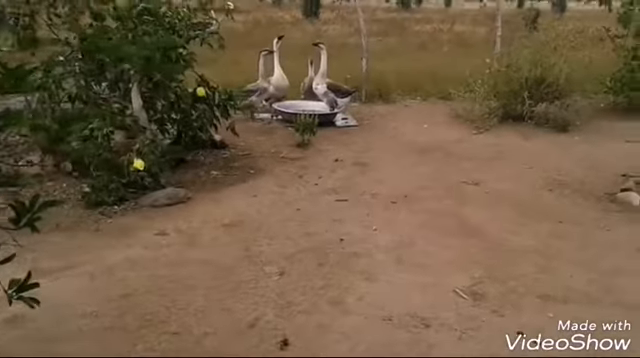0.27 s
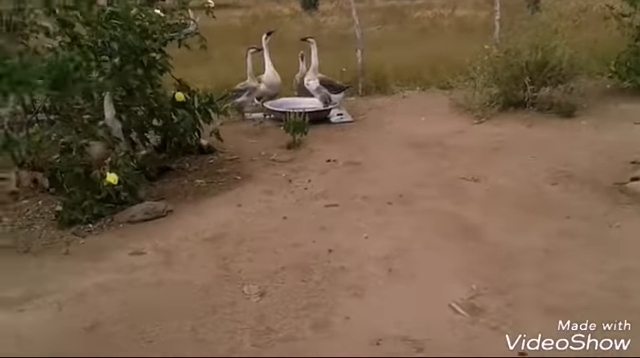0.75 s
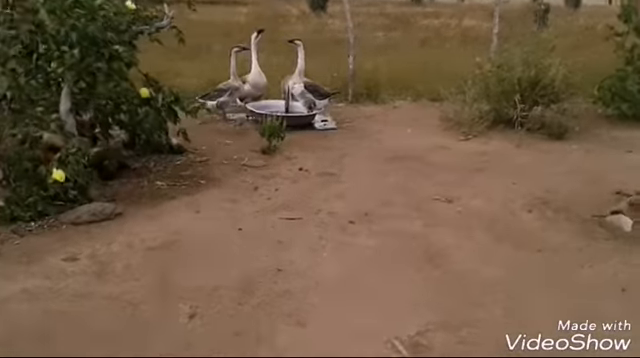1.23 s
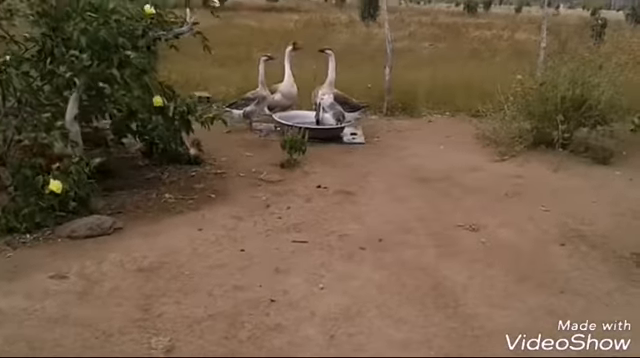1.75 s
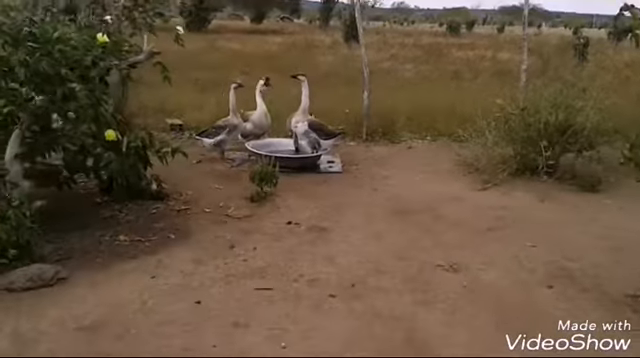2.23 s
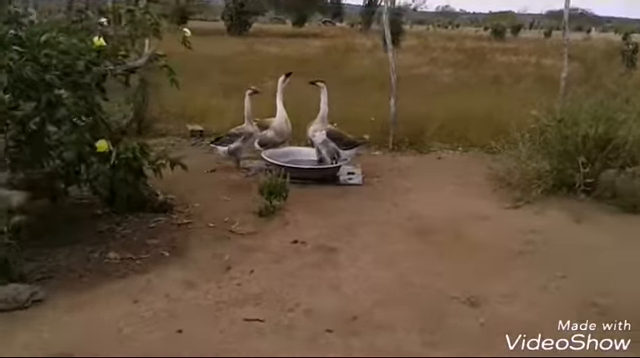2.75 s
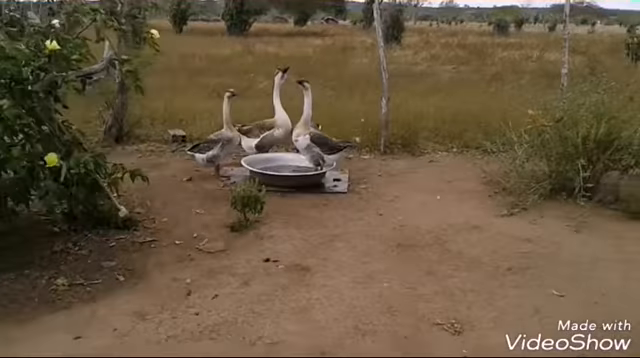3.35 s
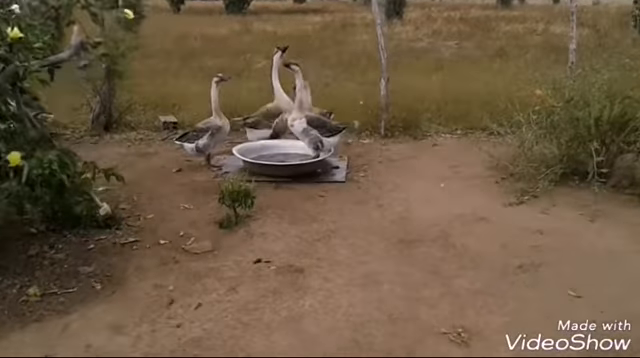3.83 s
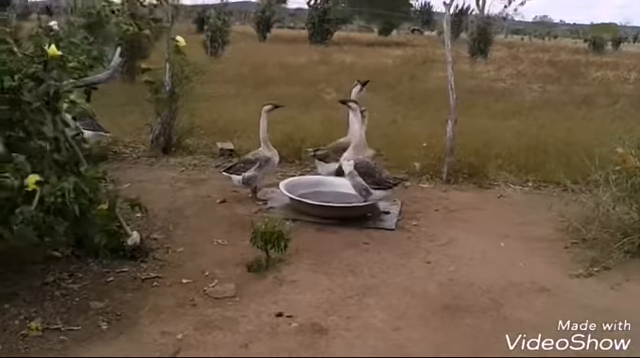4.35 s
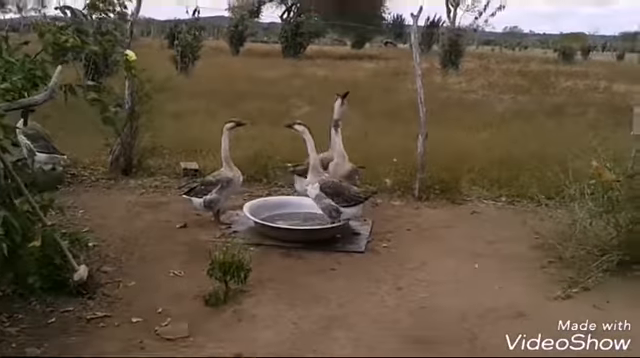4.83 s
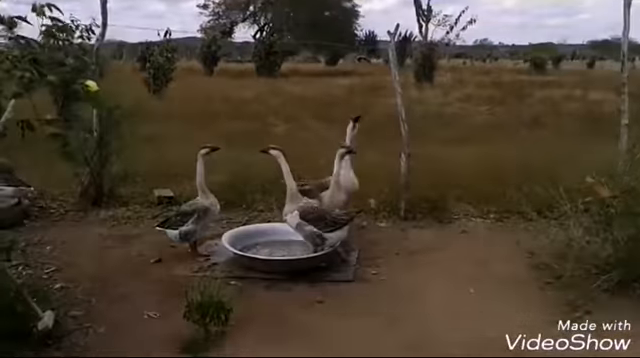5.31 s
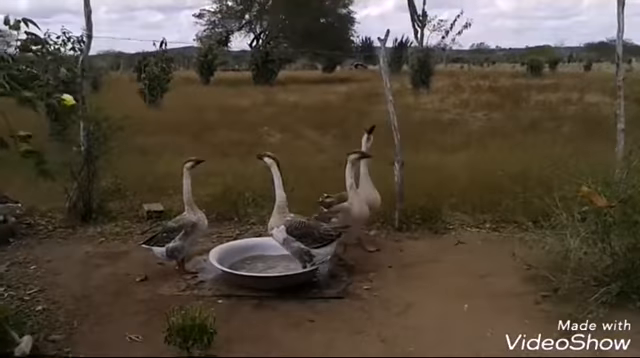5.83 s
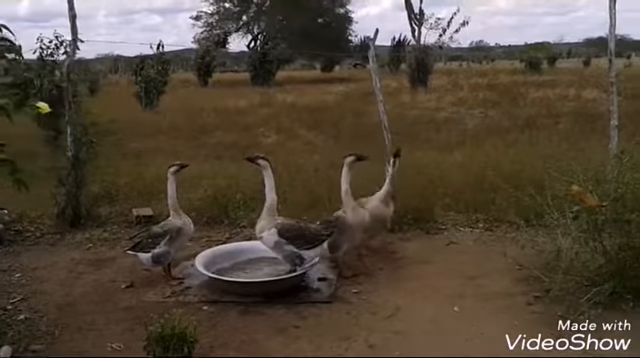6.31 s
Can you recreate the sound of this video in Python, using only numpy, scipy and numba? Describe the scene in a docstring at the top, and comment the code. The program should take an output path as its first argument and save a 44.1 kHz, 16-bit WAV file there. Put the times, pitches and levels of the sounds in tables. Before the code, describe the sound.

In a quiet yard, a few geese give spaced, reedy honks that build into a busier, louder exchange of brassy calls and yelps. Underneath, a bird paddles in a basin with small splashes, something taps, and grit crunches briefly underfoot past the middle. The microphone, close to the basin, catches soft low wind buffets, one distant peep from a small bird early on, and a faint hum.

```python
"""An open farm yard, one microphone near a water basin. Geese honk, first singly, then together and louder.
Each honk is a train of syrinx pulses and a throbbing reedy tone in a long windpipe. One bird paddles
in the basin, something taps, and grit crunches underfoot. Wind bumps the microphone;
far off, a small bird peeps once and a faint hum lies under the open-air hiss."""
import sys
import numpy as np
from scipy import signal
from scipy.fft import rfft, irfft
from scipy.io import wavfile
from scipy.ndimage import uniform_filter1d, map_coordinates
from numba import njit

SR = 44100
rng = np.random.default_rng(int(sys.argv[2]) if len(sys.argv) > 2 else 0)


def wrap_up_sound(samples):
    """Save the sound to the file named by the first command line argument, as 16-bit audio."""
    columns = np.atleast_2d(samples).T
    # keep every value between -1 and 1, then stretch to whole-number steps
    tamed = np.clip(columns, -1, 1)
    steps = np.round(tamed * 32767).astype(np.int16)
    wavfile.write(sys.argv[1], SR, steps)


N = 289737
TIME = np.arange(N) / SR

# spectra of the open air and of wind on the microphone: f/Hz, level/dB
AIR_COLOUR = [(18, -51), (30, -5), (404, 0), (472, 3.5), (1170, -16), (1870, -6.5), (5030, -16.5),
              (10700, -11.5), (15000, -15)]
WIND_COLOUR = [(15, -70), (25, -15), (70, -1.5), (130, 1), (239, -11.5), (369, -29), (520, -30), (700, -36),
               (910, -76), (1540, -120)]
# gusts on the microphone: t/s, length/s, relative level/dB
GUSTS = [(0.369, 0.51, -54), (0.677, 0.21, -48.5), (0.988, 0.068, -56), (1.37, 0.064, -42.5),
         (1.771, 0.27, -54.5), (2.155, 0.012, -41), (2.225, 0.14, -55.5), (3.884, 0.12, -49.5),
         (4.088, 0.023, -44), (4.155, 0.019, -41), (4.23, .08, -48.5), (4.557, 0.028, -44),
         (4.36, 1.32, -58), (6.082, 0.28, -58)]
# sharp puffs on the microphone: t/s, envelope level/dB
PUFFS = [(0.719, -15.5), (1.389, -35), (5.4, -24.5)]
# course of the far bird's peep: t/s, f/Hz, level/dB
PEEP = [(.85, 3120, -66), (.88, 2650, -54), (.905, 1870, -56), (.935, 1994, -56), (.97, 2330, -62)]
# trickle in the basin: t/s, relative level/dB
TRICKLE = [(0.0, -73), (0.11, -54), (0.31, -57), (0.73, -53), (1.45, -59), (1.61, -67), (1.76, -60.5),
           (1.9, -49.5), (2.45, -54), (2.63, -59.5), (3.09, -55.5), (3.57, -45), (4.52, -46), (4.66, -52),
           (4.8, -44.5), (5.16, -53.5), (5.6, -48.5), (6.2, -53.5), (6.57, -53)]
# footsteps, splashes and taps: t/s, relative level/dB, time to fall 60 dB/s
STEPS = [(4.18, -24, 0.1), (4.474, -27.5, 0.067)]
SPLASHES = [(0.249, -28.5, 0.092), (0.519, -34.5, 0.29), (1.038, -36.5, 0.19), (1.08, -32.5, 0.19),
            (2.4853, -20.5, 0.067), (2.512, -24, 0.25), (2.545, -25.5, 0.043), (2.613, -32, 0.13),
            (2.802, -29, 0.024), (2.855, -33, 0.25), (3.14, -31.5, 0.052), (3.393, -27.5, .06),
            (3.972, -23, .04), (3.997, -20.5, 0.036), (4.043, -21, 0.017), (4.265, -29, 0.52),
            (4.752, -20.5, 0.042), (4.689, -19, 0.02), (5.178, -23.5, 0.014), (5.586, -18, 0.051),
            (5.607, -16, 0.37)]
TAPS = [(2.137, -33, 0.019), (3.199, -17, 0.021), (5.397, -8.5, 0.012)]
# spectra of grit, trickle, spray and taps: f/Hz, level/dB
GRIT_COLOUR = [(600, -2), (2000, -5), (4600, 5), (7000, -4), (11000, -8), (14500, -19)]
TRICKLE_COLOUR = [(710, -4), (1200, 0.5), (1740, -4.5), (2240, -1), (3170, -4), (4220, 1), (5670, 3),
                  (6940, -4.5), (9520, -10), (14200, -15), (15000, -36)]
SPRAY_COLOUR = [(410, -53), (700, -21.5), (1170, -20), (1740, -20), (2190, -12), (3610, -10), (5660, 0.5),
                (9330, -24), (10300, -26), (15000, -40)]
TAP_COLOUR = [(700, -18), (1300, -34), (2700, 6), (3800, 0), (5600, 3.5), (8000, -13), (14000, -25)]
# four colours of throat and bill above the main resonance: f/Hz, level/dB
HOARSE = [(760, -19), (1300, 41), (1340, 37), (1700, 12.5), (1970, 13.5), (2180, 3.5), (2380, 10.5),
          (2800, 10.5), (2970, -2.5), (3840, 4.5), (4690, 5), (5500, -7), (6190, -4.5), (7860, -19.5),
          (14000, -19.5)]
BRASSY = [(760, -3), (1300, 32), (1670, 24), (1840, 19.5), (2270, 23), (2820, 2), (3280, 13.5), (4160, 15),
          (4640, 14.5), (5080, 15), (5440, 10.5), (6380, -3.5), (9980, -13), (11800, -53), (14000, -59)]
NASAL = [(1400, 30), (1900, -7), (2250, 30), (2800, 0.5), (3400, 12), (4500, 10.5), (6000, 3.5),
         (7500, -17), (14000, -17)]
CLEAR = [(1300, 38), (1750, 23), (2250, 28.5), (2800, 4.5), (3500, 13.5), (4500, 14.5), (5300, 12),
         (6200, 1), (7500, -5), (14000, -20)]
# kinds of call: throat colour, windpipe echo/0-1, roughness/0-1, treble hoarseness/0-1,
# overtone level/dB, share of reedy tone/0-1, throb depth
VOICES = {"bray": (HOARSE, .74, .22, .18, -21, .62, .85), "blare": (BRASSY, .55, .27, .3, -16, .6, .9),
          "honk": (CLEAR, .84, .18, .5, -10, .84, .3), "cluck": (CLEAR, .74, .22, .35, -15, .6, .55),
          "yelp": (CLEAR, .88, .1, .22, -10, .88, .2), "trumpet": (NASAL, .84, .12, .2, -28, .84, .1),
          "cry": (NASAL, .72, .2, .26, -17, .5, .7), "squawk": (BRASSY, .64, .33, .28, -17, .65, .65)}
# goose calls: t/s, length/s, crest/share of length, pulse rate at start/Hz, at crest/Hz, at end/Hz,
# windpipe resonance/pulse rate, crest level/dB, swell/dB, nasal/dB, rasp/dB, opening brightness/dB,
# chest/dB, shriek f/Hz, shriek/dB, kind; nasal, rasp, chest and shriek levels are relative to the call
HONKS = [ (0.091, 0.15, 0.82, 128.5, 139.2, 131.8, 7.5, -37, 20, -3.5, -1.5, 12.5, -23.5, 4600, -15, "bray"),
         (0.563, 0.15, 0.44, 128.3, 139.6, 133.8, 7.4, -33, 20.5, -7.5, -2.5, 11, -24.5, 4050, -17, "bray"),
         (1.711, 0.22, 0.72, 128.9, 143.1, 136.9, 7.27, -36, 9, -3, -2.5, -7, -26.5, 4500, -24, "bray"),
         (2.165, 0.1, 0.79, 228.7, 277.8, 278, 5.74, -38, 11.5, -7, 4.5, -4, -38, 4880, -10, "yelp"),
         (2.185, 0.18, 0.6, 246, 285.7, 274, 2.98, -35, 27, -2.5, -9, 10, -37, 4440, -15, "yelp"),
         (2.23, 0.15, 0.844, 136, 141, 132.6, 7.0, -39, 16, -6.5, 0.5, 3, -25, 4400, -8, "bray"),
         (2.969, 0.051, 0.39, 284, 276.2, 333, 3.04, -37, 10, -10, -4.5, -9, -39, 4830, -15, "yelp"),
         (3.017, 0.048, 0.76, 173.8, 186.4, 181.3, 4.6, -38, 2, -9, 1.5, 2, -28, 4300, -22, "cluck"),
         (3.268, 0.32, 0.62, 142.8, 156.6, 143.5, 6.25, -30.5, 10.5, -13.5, -10.5, 4.5, -34, 3680, -15, "honk"),
         (3.37, 0.33, 0.79, 120.4, 159, 111.3, 5.56, -41, 5, -4.5, -4.5, 10, -2, 4340, -14, "cry"),
         (3.602, 0.053, 0.62, 153.2, 161.7, 151, 6.5, -39, 14, 0, 2.5, 9, -13, 4480, -7, "cry"),
         (3.683, 0.1, 0.77, 362, 378, 395, 2.0, -29, 16, -13, -22, 3, -23.5, 4440, -22, "trumpet"),
         (3.756, 0.045, 0.81, 155, 160, 164.5, 5.9, -31.5, 9, -13, -15, -4, -29, 4270, -18, "honk"),
         (3.767, 0.175, 0.663, 366, 374.8, 359, 3.0, -35.5, 3.5, 8, 1.5, -7, -22.5, 3500, -2, "trumpet"),
         (3.821, 0.22, 0.66, 120.8, 157.3, 132.6, 5.62, -42, 4.5, -11, -1, -3, -11.5, 4300, -19, "cluck"),
         (3.922, 0.052, 0.31, 161.7, 159, 143.6, 6.0, -32, 6, -12, -18, 0, -23, 4380, -27, "honk"),
         (4.505, 0.046, 0.53, 231.6, 190, 195.5, 4.26, -34, -3.5, -6, -4, -15, -48, 4940, -16, "honk"),
         (4.539, 0.06, 0.74, 129.4, 146.5, 136.7, 6.84, -31.5, 13, -8.5, -0.5, -2, -22, 3970, -11, "blare"),
         (4.697, .085, 0.51, 191, 171.1, 180, 4.0, -38, 10.5, -4, -2, 9, -27, 4300, -5, "honk"),
         (4.754, 0.067, 0.66, 133.1, 156.3, 145.4, 5.8, -35.5, -2.5, -10.5, -8.5, 8, -39, 4400, -16, "cluck"),
         (4.83, 0.18, 0.81, 136.1, 171.9, 154.7, 5.98, -27, 7.5, -9.5, -9, 1, -22.5, 3480, -12, "squawk"),
         (4.858, 0.17, 0.6, 113.1, 130.5, 119.3, 6.14, -32, 4.5, -5.5, 4.5, -14, -25, 4370, -37, "squawk"),
         (5.26, 0.27, 0.69, 131.7, 159.9, 148.2, 6.01, -25.5, 19, -8.5, -10, 5.5, -26.5, 4480, -18, "honk"),
         (5.7, .18, 0.67, 121.2, 136.8, 132, 6.52, -28, 8.5, -3.5, -2, -12, -20, 4790, -6.5, "blare"),
         (5.982, 0.1, 0.38, 300.5, 267, 218, 3.15, -37, 29.5, -8, -6.5, 28, -25, 3440, -20, "cluck"),
         (6.077, 0.22, 0.75, 119.2, 152.9, 143.1, 5.97, -25, 8.5, -5, -3.5, -2.5, -22.5, 4710, -7, "blare"),
         (6.306, 0.079, 0.38, 148.8, 151.4, 140, 6.33, -30.5, 9, -3.5, -1.5, -6, -23.5, 4120, -4, "cry")]
TAIL_S = .1   # time left for a call to die away


def from_db(db):
    """Decibels to gain."""
    return 10 ** (np.asarray(db) / 20)


def rms_one(x):
    """Scale to unit power."""
    return x / np.sqrt(np.mean(x ** 2) + 1e-20)


def evened(x):
    """Hold the power at one over a few hundredths of a second."""
    power = uniform_filter1d(uniform_filter1d(x ** 2, size=900), size=900)
    return x / np.sqrt(np.abs(power) + 1e-14)


def blend(noisy, tone, share):
    """Mix two sounds to unit power, the given share of it from the tone."""
    return evened(np.sqrt(1 - share) * evened(noisy) + np.sqrt(share) * evened(tone))


def along(rows):
    """The columns of a timed curve at every sample."""
    times, *columns = np.transpose(rows)
    return [np.interp(TIME, times, column) for column in columns]


def drift(rate, t=TIME):
    """Smooth random wander of spread about one, changing rate times a second."""
    return map_coordinates(rng.standard_normal(8000), [(t - t[0]) * rate], order=2, mode="wrap")


def band(x, low_hz, high_hz, order=2):
    """Butterworth band-pass."""
    return signal.sosfilt(signal.butter(order, [low_hz, high_hz], "band", fs=SR, output="sos"), x)


def coloured(x, spectrum, size=4096):
    """Minimum-phase filter with the given spectrum, falling steeply beyond its ends."""
    hz, db = np.transpose(spectrum)
    log_hz = np.log(np.maximum(np.arange(size // 2 + 1), .5) * SR / size)
    outside = np.maximum(log_hz - np.log(hz[-1]), 0) + np.maximum(np.log(hz[0]) - log_hz, 0)
    cepstrum = irfft(np.log(from_db(np.interp(log_hz, np.log(hz), db) - 87.4 * outside)))
    cepstrum[1:size // 2] *= 2
    cepstrum[size // 2 + 1:] = 0
    return signal.fftconvolve(x, irfft(np.exp(rfft(cepstrum))))[:len(x)]


def sliding(x, hz, width_hz):
    """A resonance at unit power whose centre follows the curve hz."""
    turn = np.exp(2j * np.pi * np.cumsum(hz) / SR)
    pole = np.exp(-np.pi * width_hz / SR)
    return evened(np.real(turn * signal.lfilter([1], [1, -2 * pole, pole * pole], x / turn)))


def bursts(rows, rise_share=0.079):
    """Envelope of short events that build quickly and die away."""
    out = np.zeros(N)
    for start, level_db, decay_s in rows:
        age = np.maximum(TIME - start, 0)
        rise = np.minimum(age / (rise_share * decay_s), 1)
        out += rise * from_db(level_db - 60 * np.minimum(age / decay_s, 2))
    return out


def grains(colour, per_s, spread_db):
    """A dense spray of tiny clicks of very different sizes over a little hiss."""
    sizes = from_db(spread_db * np.minimum(rng.exponential(1, N), 5)) * rng.standard_normal(N)
    clicks = sizes * (rng.random(N) < per_s / SR)
    return rms_one(coloured(clicks + 0.34 * rng.standard_normal(N), colour))


def background(air_db=-64, hum_hz=114, hum_db=-66.5):
    """Open-air hiss and a far, wavering hum."""
    air = from_db(air_db) * rms_one(coloured(rng.standard_normal(N), AIR_COLOUR))
    hum = np.sin(2 * np.pi * np.cumsum(hum_hz * (1 + 0.0186 * drift(1.8))) / SR)
    return air + from_db(hum_db + 0.31 * drift(4.8)) * rms_one(hum)


def yard(x, near_db=-6, near_t60=0.047, far_db=-24, far_t60=0.12):
    """Ground and basin scatter the sound close by; bushes farther off return a faint, dull tail."""
    age = TIME[:SR // 2]
    near = rng.standard_normal(len(age)) * from_db(-60 * age / near_t60) * (age > .0012)
    far = band(rng.standard_normal(len(age)), 313, 2000) * from_db(-60 * age / far_t60) * (age > .025)
    response = from_db(near_db) * near / np.linalg.norm(near)
    response += from_db(far_db) * far / np.linalg.norm(far)
    return x + signal.fftconvolve(x, response)[:N]


def small_bird(quaver=0.084):
    """Far off, one thin, quavering peep that dips and rises."""
    hz, level_db = along(PEEP)
    singing = (TIME > PEEP[0][0]) & (TIME < PEEP[-1][0])
    phase = 2 * np.pi * np.cumsum(hz * (1 + quaver * drift(310))) / SR
    return singing * from_db(level_db) * np.sin(phase)


def wind(gain_db=2.0, calm_db=-71, rise_s=0.0056, fall_db_per_s=247, puff_hz=210, puff_s=0.0016):
    """Lumpy turbulence right on the microphone port: gusts rise, hold and die away; a few sharp puffs."""
    buffets = evened(coloured(rng.standard_normal(N), WIND_COLOUR))
    strength = np.full(N, from_db(calm_db))
    for start, length, level_db in GUSTS:
        age = TIME - start
        fall_db = fall_db_per_s * np.maximum(age - length, 0)
        strength += np.clip(age / rise_s, 0, 1) * from_db(level_db - fall_db)
    out = buffets * strength * from_db(gain_db + 4.5 * np.tanh(drift(50)))
    for start, level_db in PUFFS:
        age = np.clip(TIME - start, 0, .1)
        out -= from_db(level_db) * np.sin(2 * np.pi * puff_hz * age) * np.exp(-age / puff_s)
    return out


def steps(gain_db=-9):
    """Dry grit crunches underfoot."""
    return from_db(gain_db) * bursts(STEPS) * grains(GRIT_COLOUR, per_s=3100, spread_db=2.5)


def water(trickle_db=-2, splash_db=-9, tap_db=-9, patchy_db=3.0):
    """At the basin, water trickles, paddling throws up sprays of drops, and something taps."""
    flow = from_db(along(TRICKLE)[0] + trickle_db + patchy_db * drift(45))
    trickle = flow * grains(TRICKLE_COLOUR, per_s=5000, spread_db=3.0)
    spray = from_db(splash_db) * bursts(SPLASHES) * grains(SPRAY_COLOUR, per_s=7000, spread_db=3.0)
    taps = from_db(tap_db) * bursts(TAPS) * grains(TAP_COLOUR, per_s=9800, spread_db=4.5)
    return trickle + spray + taps


@njit
def windpipe(x, lag, echo):
    """Sound runs up and down a tube, which rings at multiples of one resonance."""
    y = x.copy()
    for i in range(len(x)):
        back = i - lag[i]
        if back >= 0:
            k = int(back)
            y[i] += echo * (y[k] + (back - k) * (y[k + 1] - y[k]))
    return y


def effort(age, length, arch, fade_db=4.5, release_db_per_s=515):
    """One arch of effort bends a call's pitch, level and brightness together."""
    crest, start_hz, crest_hz, end_hz, crest_db, swell_db, nasal_db, rasp_db, opening_db = arch
    rising = np.maximum(1 - age / (crest * length), 0) ** 2
    falling = np.clip((age / length - crest) / (1 - crest), 0, 1.3) ** 2
    pitch = crest_hz + (start_hz - crest_hz) * rising + (end_hz - crest_hz) * falling
    level_db = crest_db - swell_db * rising - fade_db * np.minimum(falling, 1)
    level_db -= release_db_per_s * np.maximum(age - length, 0)
    return pitch, level_db, nasal_db + opening_db * rising, rasp_db + opening_db * rising


def honk(t, controls, multiple, chest_db, shriek_hz, shriek_db, kind,
         jitter=0.029, neck_db=-24, crack_db=2.0, cracks_per_s=70, attack_share=0.085):
    """Uneven syrinx pulses ring the windpipe and make a reedy tone throb; both leave through the bill."""
    pitch, level_db, nasal_db, rasp_db = controls
    throat, echo, rough, hoarse, overtone_db, tonal, throb = VOICES[kind]
    pitch = pitch * (1 + .034 * rough * drift(45, t))
    cycle = (np.cumsum(pitch * (1 + jitter * rough * drift(225.3, t))) / SR) % 1
    pulses = rms_one(np.sinc((cycle - np.round(cycle)) * SR / pitch * .7))
    breath = rms_one(rng.standard_normal(SR)[:len(t)] * (np.exp(-4 * cycle) + .35))
    shimmer = from_db(4.5 * rough * drift(130, t))
    # the pulses lock to the windpipe, so pitch and resonance rise and fall together
    pipe_hz = multiple * pitch
    lag = SR / (pipe_hz * (1 + .09 * rough * drift(60, t)))
    # the reedy tone sits on that resonance and swells once in every pulse
    phase = 2 * np.pi * np.cumsum(pipe_hz * (1 + .075 * rough * drift(240, t))) / SR
    swell = shimmer * np.exp(throb * np.sin(2 * np.pi * cycle))
    reed = swell * sum(np.sin(k * phase + rng.uniform(0, 2 * np.pi)) for k in range(2, 7))
    voice = windpipe((pulses + 1.5 * rough * breath) * shimmer, lag, echo)
    # higher up the sound is more turbulent and loses more on each trip along the tube
    twang = windpipe((pulses + 2.3 * hoarse * breath) * shimmer, lag, echo ** 1.3)
    harsh = windpipe((pulses + 3.6 * hoarse * breath) * shimmer, lag, echo ** (14 * hoarse))
    twang = blend(band(twang, 900, 15000), reed, tonal ** 4)
    harsh = blend(band(harsh, 900, 15000), reed, tonal ** (36 * hoarse))
    # a call is ragged while quiet, and the tone takes over as it gets louder
    tone_share = tonal * from_db(.5 * (level_db - level_db.max()))
    body_hz = pipe_hz.mean() * .775, pipe_hz.mean() * 1.2
    tone = band(swell * np.sin(phase), *body_hz, order=3)
    body = blend(band(voice, *body_hz, order=3), tone, tone_share)
    octave_ring = sliding(twang, 2 * pipe_hz, width_hz=390)
    overtone = from_db(overtone_db) * blend(octave_ring, swell * np.sin(2 * phase), tone_share)
    # a little of the low harmonics passes through breast and neck
    chest = from_db(chest_db) * evened(band(pulses * shimmer, 130, 384, order=3))
    neck = from_db(neck_db) * evened(band(pulses + 2 * rough * breath, 319, 523))
    # the shriek slides with the pitch; the upper resonances crack and catch, each on its own
    nasal = from_db(nasal_db - 1) * evened(band(coloured(twang, throat), 933, 3810, order=4))
    rasp = from_db(rasp_db - 4) * evened(band(coloured(harsh, throat), 2950, 15000, order=4))
    slide_hz = shriek_hz * pitch / np.median(pitch) * (1 + .02 * drift(cracks_per_s, t))
    shriek = from_db(shriek_db) * sliding(harsh, slide_hz, width_hz=400)
    top = sum(part * from_db(crack_db * np.tanh(drift(cracks_per_s, t)))
              for part in (nasal, rasp, shriek))
    attack_s = attack_share * (t[-1] - t[0] - TAIL_S)
    edges = np.clip(np.minimum(t - t[0], t[-1] - t) / attack_s, 0, 1)
    return from_db(level_db) * edges * (body + overtone + top + chest + neck)


def geese():
    """The honks around the basin, overlapping where the birds call together."""
    out = np.zeros(N)
    for start, length, crest, start_hz, crest_hz, end_hz, multiple, *rest in HONKS:
        *levels_db, chest_db, shriek_hz, shriek_db, kind = rest
        span = (TIME >= start) & (TIME < start + length + TAIL_S)
        controls = effort(TIME[span] - start, length, (crest, start_hz, crest_hz, end_hz, *levels_db))
        out[span] += honk(TIME[span], controls, multiple, chest_db, shriek_hz, shriek_db, kind)
    return out


def scene():
    """Birds, water and steps out in the yard, wind on the microphone; one channel."""
    return (yard(geese() + small_bird() + water() + steps()) + wind() + background())[None]


def record(dry, cutoff_hz=15100):
    """The recorder cuts the top steeply."""
    return signal.sosfilt(signal.ellip(12, .1, 90, cutoff_hz, fs=SR, output="sos"), dry)


dry = scene()
out = record(dry)
wrap_up_sound(out)
```